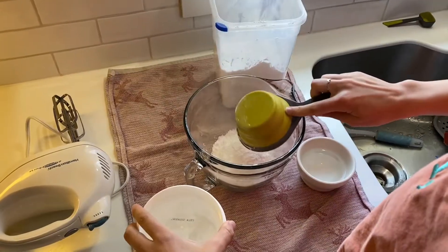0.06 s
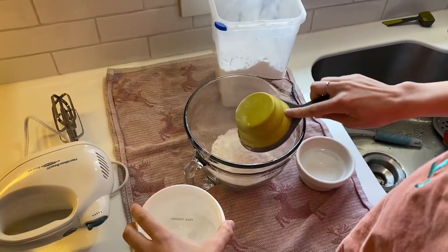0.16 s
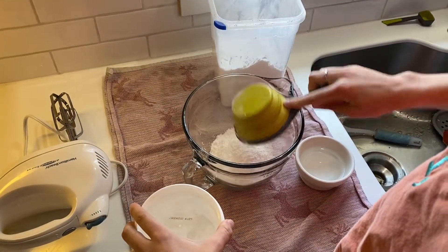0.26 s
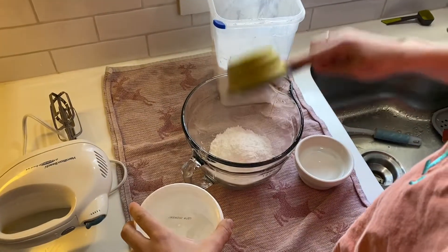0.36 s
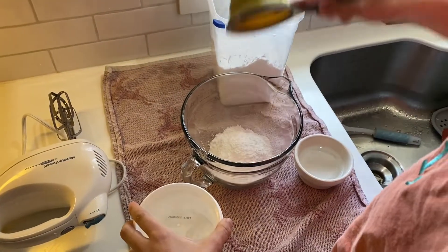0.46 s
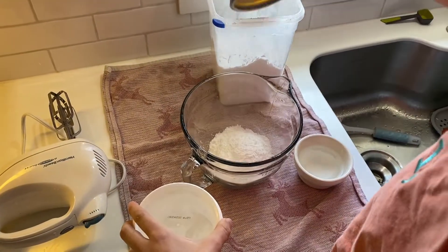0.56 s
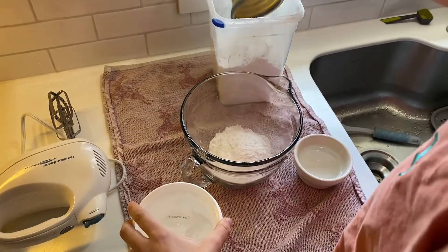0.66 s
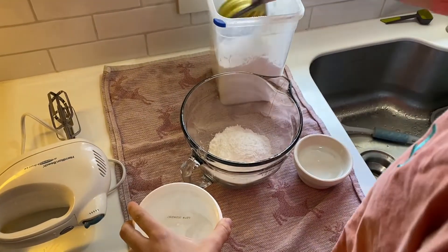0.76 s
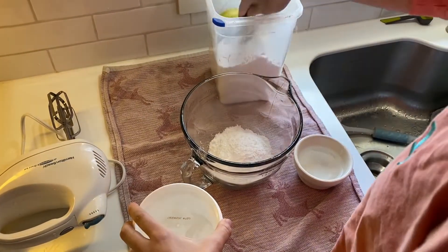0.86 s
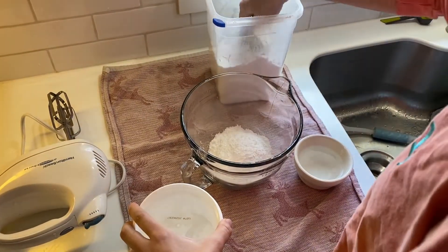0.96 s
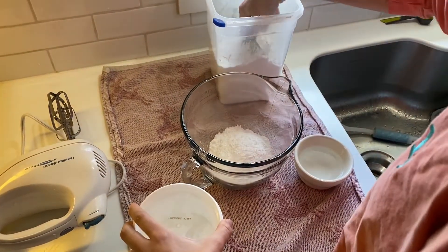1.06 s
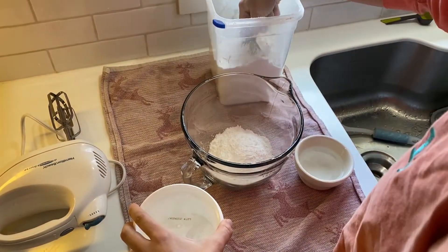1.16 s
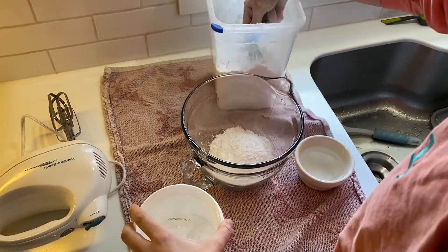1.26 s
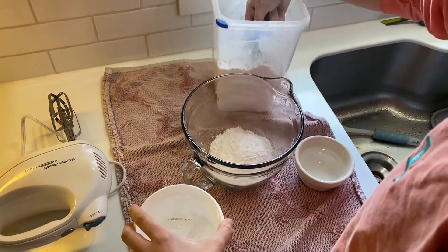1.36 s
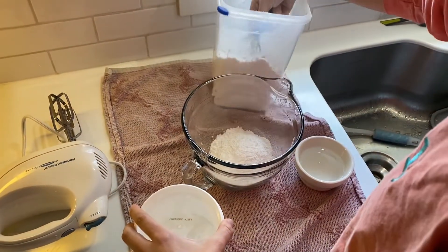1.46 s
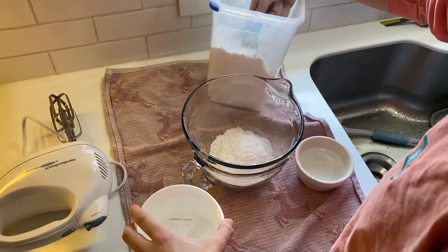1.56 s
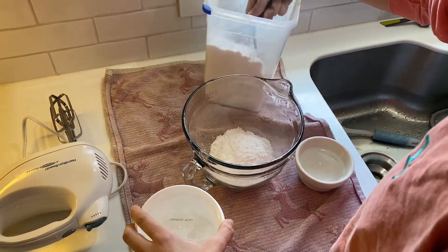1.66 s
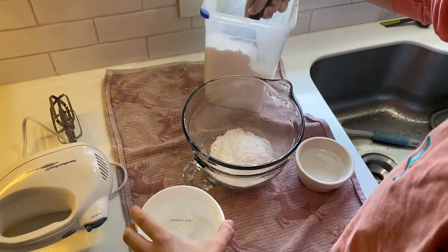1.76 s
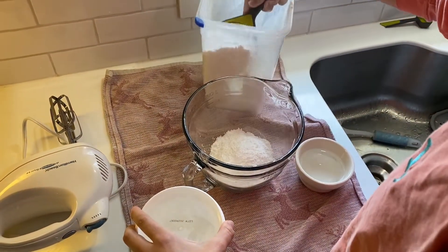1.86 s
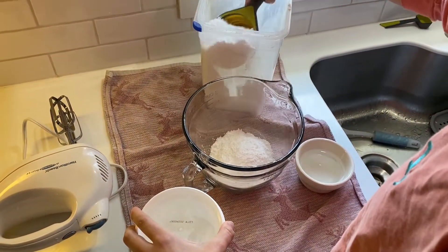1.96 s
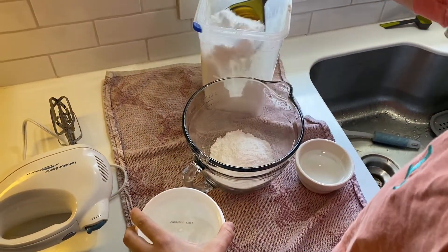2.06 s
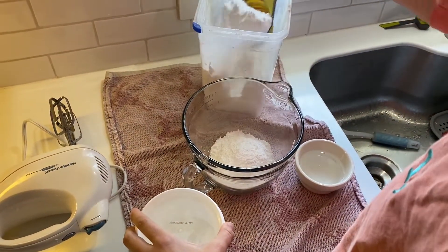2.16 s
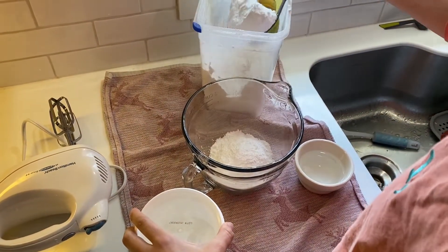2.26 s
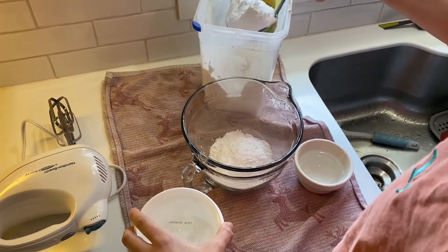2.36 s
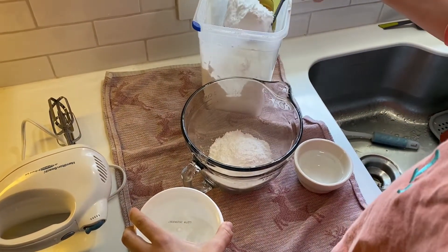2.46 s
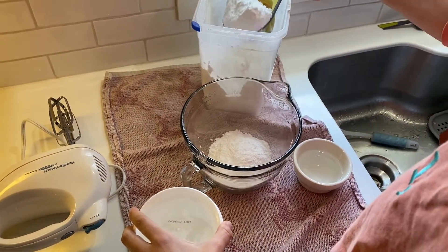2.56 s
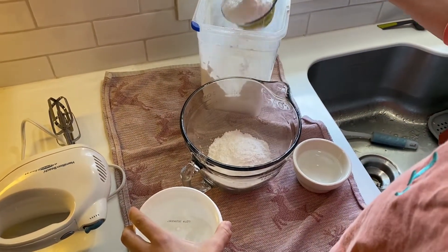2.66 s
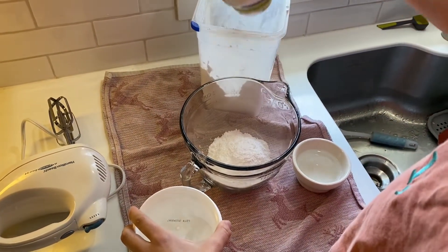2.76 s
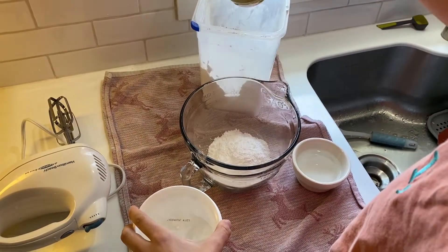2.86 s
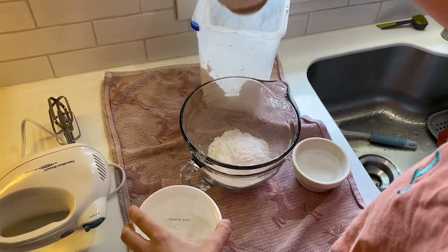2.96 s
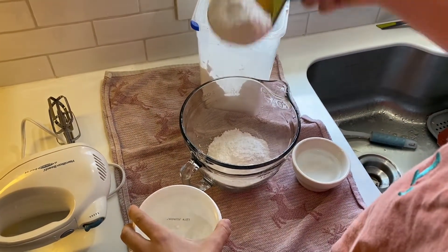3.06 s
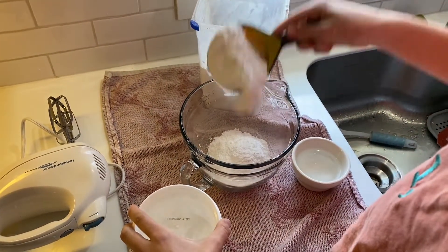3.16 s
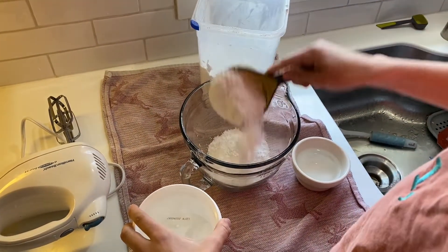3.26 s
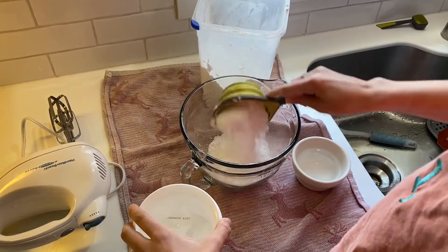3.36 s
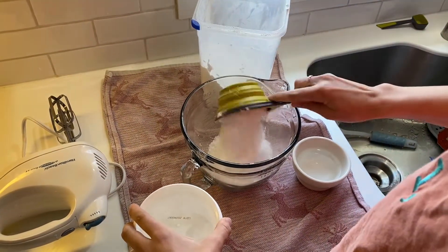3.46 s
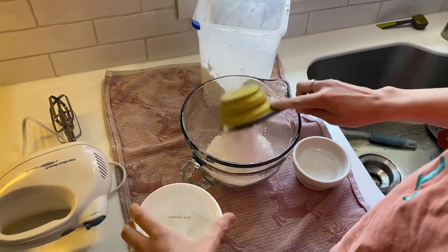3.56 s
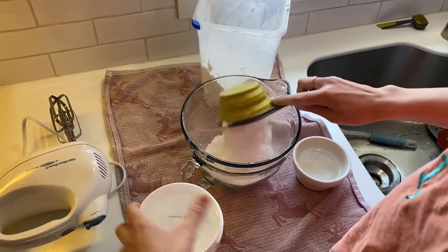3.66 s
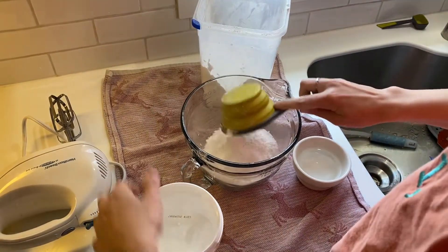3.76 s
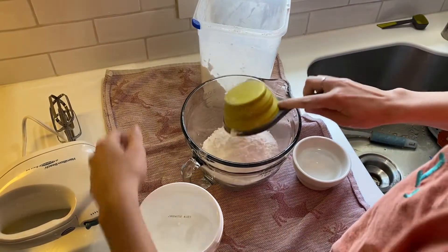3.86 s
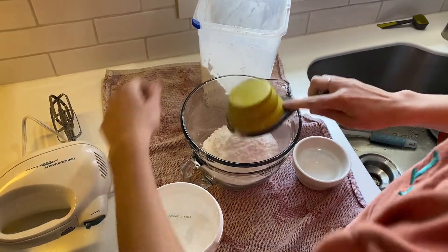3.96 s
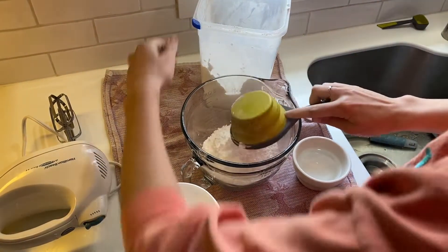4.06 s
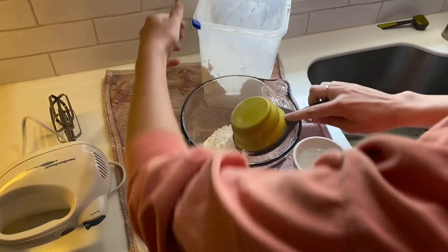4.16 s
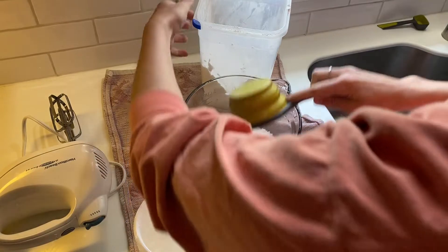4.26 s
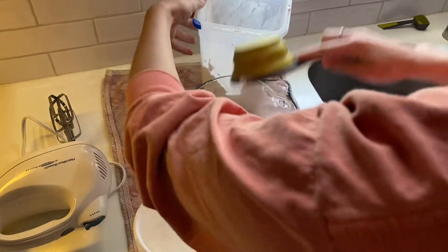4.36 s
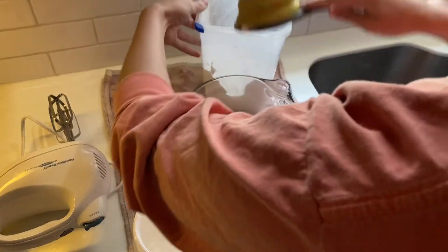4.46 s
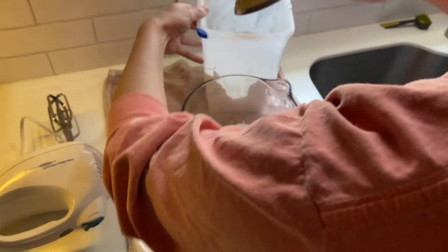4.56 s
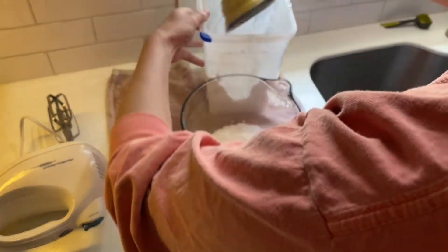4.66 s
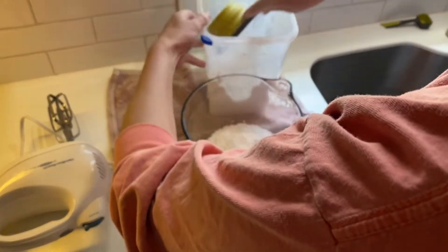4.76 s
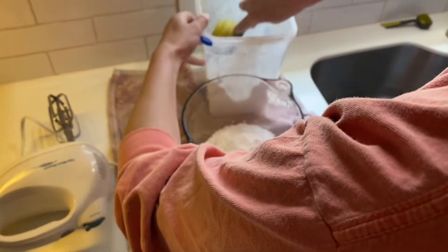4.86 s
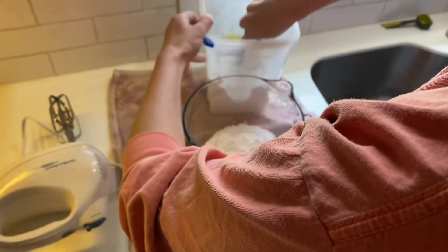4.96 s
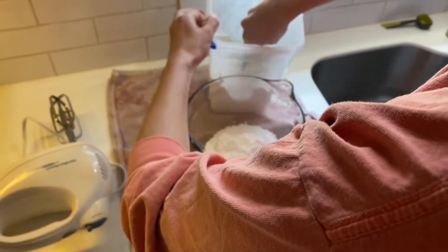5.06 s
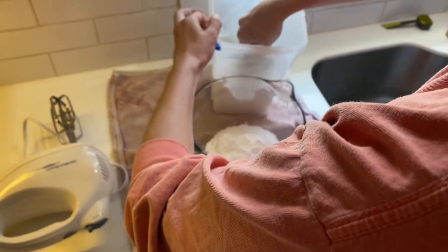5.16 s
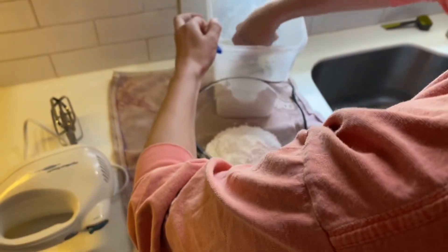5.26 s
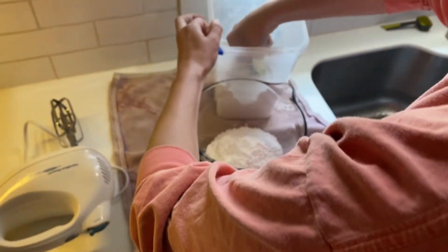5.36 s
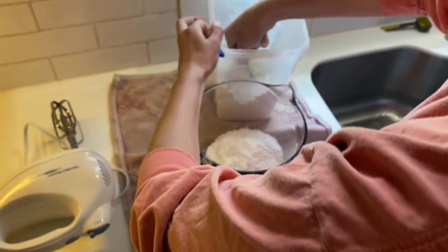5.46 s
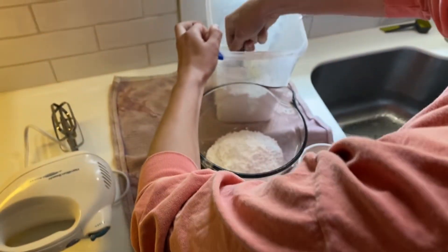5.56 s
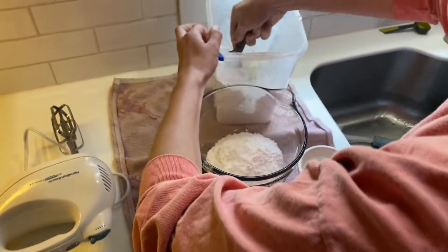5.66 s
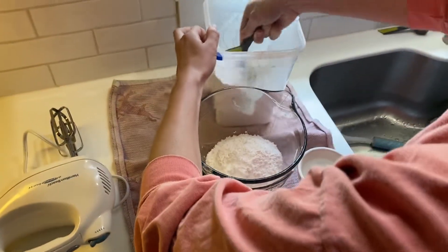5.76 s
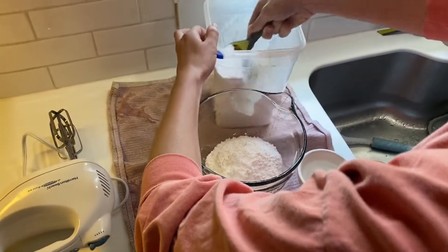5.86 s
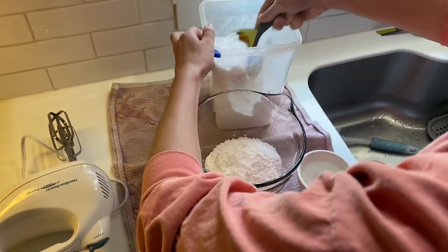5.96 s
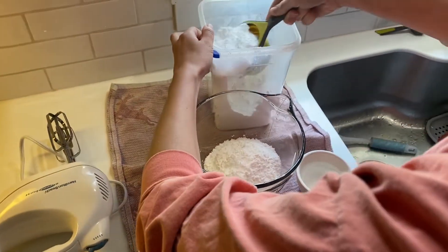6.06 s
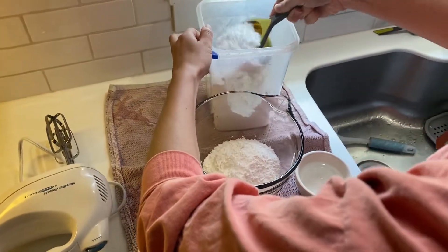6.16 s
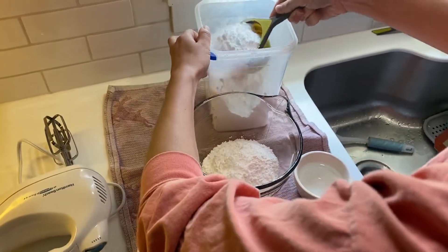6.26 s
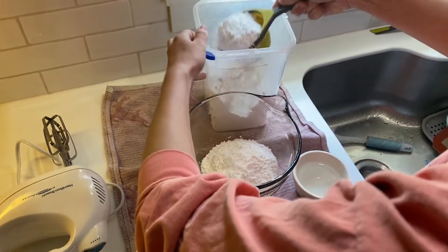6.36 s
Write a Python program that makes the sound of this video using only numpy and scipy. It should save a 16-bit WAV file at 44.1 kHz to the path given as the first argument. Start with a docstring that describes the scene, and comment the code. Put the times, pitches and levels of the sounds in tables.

```python
"""A quiet kitchen close up: air and fridge tones throughout, made of coloured noise and wavering sines.
At once a metal measuring cup taps a glass bowl's rim twice: decaying modes for glass and cup, noise for cracks.
From half a second on it knocks a plastic tub (short modes, thumps, ticks) and drags through the powder in it
(uneven noise); three more taps fall between about 3.6 and 4.1 s, and knocks and drags go on to the end.
Tiled walls add a short tail of decaying noise to the taps, knocks and drags."""
import sys
import numpy as np
from scipy import signal
from scipy.fft import rfft, irfft
from scipy.io import wavfile
from scipy.ndimage import uniform_filter1d

SR = 44100
rng = np.random.default_rng(int(sys.argv[2]) if len(sys.argv) > 2 else 0)


def master_out(mix):
    """Clip the mix to full scale and print it as 16-bit PCM to the path in sys.argv[1]."""
    frames = np.transpose(np.atleast_2d(mix))
    ceiling = np.clip(frames, -1, 1)
    pcm = np.round(ceiling * 32767).astype(np.int16)
    wavfile.write(sys.argv[1], SR, pcm)


N = 282240
T = np.arange(N) / SR  # seconds
HZ = np.maximum(np.fft.rfftfreq(N, 1 / SR), 1)
SIDES = np.array([[1.], [-1.]])  # left, right

# Cup on rim. Each row: start in seconds, cup level in dB, cup tilt in dB per octave, crack in dB,
# clatter in dB, counter boom in dB, foot of the bowl in dB.
TAPS = [(.001, -31.5, 4, -17.5, -41.5, -33.5, -38), (0.143, -33, 4, -16.5, -37, -29, -34.5),
        (3.5862, -47, 3.5, -24, -35.5, -33.5, -39), (4.0349, -62, -0.5, -34.5, -51, -44, -40.5),
        (4.1231, -40, 1.5, -23, -37.5, -39.5, -34)]
# Modes of the cloth-covered counter. Each row: pitch in Hz, relative level in dB, t60 in seconds.
COUNTER = [(76.35, 0.5, 0.45), (56.4, -3.5, 0.51), (46.7, -9.5, 0.41), (104.6, -8, .2)]
# Short modes of the tub wall: its click, then its sharp edge.
# Each row: pitch in Hz, relative level in dB, t60 as a share of the whole knock's or catch's.
TUB_WALL = [(640, -8, 0.82), (799, -1, 0.57), (1060, -4, 0.95), (1259, -7, 0.81), (1433, -6, 0.65)]
TUB_EDGE = [(1914, -5, 0.48), (2365, -5.5, 0.49), (2838, -3.5, 0.36), (3320, -7.5, 0.17),
            (4090, -15.5, 0.24)]


def undb(db):
    """Turns a level in dB into a gain."""
    return 10 ** (np.asarray(db) / 20)


def along(points):
    """Reads the second column at every frequency, with straight lines on a log pitch axis."""
    hz, values = np.transpose(points)
    return np.interp(np.log(HZ), np.log(hz), values)


def spread(gain, width):
    """Noise of the given colour, rms 1: partly unrelated left and right, and later on the right."""
    lag_s = .00003
    mid, side = rfft(rng.standard_normal((2, N))) * gain
    shift = np.exp(1j * np.pi * HZ * lag_s * SIDES)
    noise = irfft((mid + width * SIDES * side) * shift, N)
    return noise / noise.std()


def fade(t60, rise=0.0013):
    """Time axis and a quick rise with an exponential fall; t60 is the seconds it takes to fall 60 dB."""
    t = T[:int(1.2 * t60 * SR) + 1]
    return t, np.exp(-np.log(1000) * t / t60) * (1 - np.exp(-t / rise))


def ring(hz, db, t60, pan_db=0, width=0, rise=0.0013):
    """One decaying mode, whose lobes reach left and right out of step; pan is left minus right."""
    t, env = fade(t60, rise)
    wave = np.sin(2 * np.pi * hz * t + SIDES * np.arctan(width))
    return undb(db + SIDES * pan_db / 2) * env * wave


def add(out, s, x):
    """Mixes x into out from second s."""
    i = int(s * SR)
    n = min(x.shape[-1], N - i)
    out[..., i:i + n] += x[..., :n]


def walk(rate):
    """Slow random wandering, spread 1, with a new random value `rate` times a second."""
    k = int(SR / rate)
    steps = np.repeat(rng.standard_normal(N // k + 1), k)
    x = uniform_filter1d(steps, k)[:N]
    return x / x.std()


def tone(hz, db, waver):
    """A motor tone that drifts a little in pitch (waver, in Hz) and in strength."""
    turn = 2 * np.pi * np.cumsum(hz + waver * walk(12)) / SR
    level_db = db + 2.0 * walk(9) + 1.2 * SIDES * walk(15.0)
    return np.sqrt(2) * undb(level_db) * np.sin(turn + 0.27 * SIDES)


def kitchen():
    """Steady air, most alike left and right in the bass, and the tones of the fridge."""
    # Colour of the air. Each row: pitch in Hz, relative level in dB per Hz.
    air_colour = [(20, -41), (35, -20.5), (60, -7.5), (90, -11.5), (200, -13.5), (250, -11), (330, -17.5),
                  (450, -22), (1050, -31), (1300, -35.5), (1900, -48.5), (3500, -50.5), (7500, -56),
                  (12000, -63), (16000, -71)]
    # Likeness of left and right in the air. Each row: pitch in Hz, likeness from 0 to 1.
    alike = [(60, 1), (130, 0.78), (290, .55), (640, 0.035), (16000, .05)]
    # Steady fridge tones. Each row: pitch in Hz, level in dB, wavering in Hz.
    hum = [(58.7, -66.5, 1.2), (121.6, -74.5, 0.52), (236.2, -61, 2), (593, -82.5, 3.4)]
    # A higher fridge tone that comes and goes. Each row: time in seconds, level in dB.
    whine_levels = [(0, -79), (.68, -66), (1.5, -67), (2.1, -81), (2.5, -66.5), (3.4, -63.5), (3.9, -90),
                    (4.58, -76.5), (4.85, -66.5), (6.4, -64.5)]
    air_db, whine_hz = -58, 398.7

    like = np.clip(along(alike), 0, 1)
    mid, side = rfft(rng.standard_normal((2, N))) * undb(along(air_colour))
    air = irfft(mid * np.sqrt(1 + like) + SIDES * side * np.sqrt(1 - like), N)
    whine = tone(whine_hz, np.interp(T, *np.transpose(whine_levels)), 0.72)
    return air / air.std() * undb(air_db) + whine + sum(tone(*line) for line in hum)


def tap_ring():
    """Each tap stops the old ring, mostly the bowl's, and starts it anew; modes are stronger near a lobe."""
    # Strongest ringing modes of the taps, mostly the bowl's; the short one at 4205 Hz is probably the cup.
    # The rim bends in close pairs that beat. Each row: pitch in Hz, t60 in seconds,
    # left minus right in dB, stereo width (minus: right comes first).
    ring_modes = [(581.6, .57, 0, .2), (619.5, .6, 3, .3), (1471.8, .63, 6, -.55), (1500.7, .64, -1, 1.05),
                  (2628.5, .41, 5, -.4), (2694.5, .32, -3, .35), (3781, .3, -3, .3), (4205, .06, -10, 1.2),
                  (4240, .34, -6, .8), (4769, .38, -2, 1.6), (6192, .1, 1, -.5), (6441, .17, 1, .1),
                  (7595, .27, -5, -.5), (10800, .22, -1, 0)]
    # How each mode lies round the rim, in the same order. Each row: level in dB when struck on a lobe,
    # waves round the rim (0: the same all round), angle of a lobe in degrees.
    lobes = [(-29, 2, 0), (-40.5, 2, 144), (-30.5, 3, 143.7), (-26, 3, 158.5), (-32.5, 4, 71),
             (-27, 4, 169.4), (-33, 5, 31.7), (-23.5, 0, 0), (-42, 1, 101), (-39.5, 5, 1), (-34, 5, 109),
             (-38.5, 5, 26), (-52, 3, 142), (-54, 3, 16)]
    # How the ring takes each tap. Each row: place on the rim in degrees, level in dB,
    # tilt in dB per octave, share of the ring time left by the powder.
    landings = [(56.7, 1.1, .8, 1), (137.5, 0, -.5, 1), (123, -3.9, -1, .9), (46.1, -7.8, .1, .86),
                (40.4, -6.7, 1.8, .86)]
    node_db = -25  # what is left of a mode struck on its node

    out = np.zeros((2, N))
    starts = [row[0] for row in TAPS]
    gaps = np.diff(starts + [N / SR])  # seconds until the next tap
    for s, (place, tap_db, tilt_db, share), free in zip(starts, landings, gaps):
        for (hz, t60, pan_db, width), (db, waves, lobe) in zip(ring_modes, lobes):
            reach = np.hypot(np.cos(np.radians(waves * (place - lobe))), undb(node_db))
            level_db = db + tap_db + tilt_db * np.log2(hz / 1500)
            mode = reach * ring(hz, level_db, share * t60, pan_db, width)
            stop = np.clip((free - T[:mode.shape[1]]) / .002 + 1, 0, 1)  # 2 ms fade-out
            add(out, s, mode * stop)
    return out


def taps():
    """Each tap also rings the cup, cracks, clatters, sounds the bowl's foot and thuds into the counter."""
    # Pitches of the cup's modes, in Hz.
    cup_hz = [1040, 1655, 1720, 4285, 5515, 5865, 6099, 6725, 7720, 8280, 8683, 8882, 9318, 9410, 9706,
              10400, 10970, 11370, 11750, 12350]
    # The cup rings thinner and shorter, one row for each pitch. Each row: level in dB, t60 in seconds,
    # left minus right in dB, stereo width from 0 to 1.
    cup = [(-5, 0.25, 5, 0.2), (-16, 0.49, -2.5, .9), (-12, 0.37, -3.5, .9), (-17, 0.14, -6, .5),
           (-17.5, 0.18, 2.5, 0.01), (-21, 0.3, -4, .5), (-20, 0.18, -5.5, 0.8), (-25, 0.4, -6.5, 0.3),
           (-17.5, 0.17, -9.5, .8), (-27, 0.098, -2, 1), (-25, 0.06, -1.5, 0.7), (-29, .18, -0.5, 0.7),
           (-26.5, .2, -1, 0.3), (-25, 0.17, -0.5, .5), (-28, .2, -1.5, 0), (-21, .17, -3.5, .1),
           (-21.5, 0.1, -2, .1), (-16.5, .09, 0, .1), (-26.5, 0.17, -4, 0.3), (-26, .09, 0, .8)]
    # Colour of crack and clatter. Each row: pitch in Hz, relative level in dB per Hz.
    crack_colour = [(88, -39.5), (150, -3), (1480, 0.5), (2180, -8), (2760, -6), (3290, -23), (4240, -6),
                    (5250, -18.5), (6640, -17), (11000, -25), (16000, -66)]
    # Modes of the bowl's foot. Each row: pitch in Hz, relative level in dB, t60 in seconds.
    foot = [(152, 1, 0.13), (180, 3, 0.11), (356.5, -5.5, 0.13), (467, -7.5, 0.044)]
    crack_t60_s, clatter_t60_s = 0.04, .2

    out, burst = np.zeros((2, N)), np.zeros(N)
    luck = rng.standard_normal((len(TAPS), len(cup)))
    for (s, cup_db, tilt_db, crack_db, clatter_db, boom_db, foot_db), odd in zip(TAPS, luck):
        for hz, (db, t60, pan_db, width), z in zip(cup_hz, cup, odd):
            level_db = db + cup_db + tilt_db * np.log2(hz / 3000) + 2 * z
            add(out, s, ring(hz, level_db, t60, pan_db, width))
        for hz, db, t60 in COUNTER:
            add(out, s, ring(hz, db + boom_db, t60, rise=.005))  # the cloth slows the push
        for hz, db, t60 in foot:
            add(out, s, ring(hz, db + foot_db, t60, rise=.003))
        add(burst, s, undb(crack_db) * fade(crack_t60_s)[1])
        add(burst, s, undb(clatter_db) * fade(clatter_t60_s, 0.017)[1])
    return out + burst * spread(undb(along(crack_colour)), 0.59)


def knocks():
    """The thin wall clicks, higher parts mostly dying sooner; the tub's hollow thumps; the counter shakes."""
    # Cup against the tub wall. Each row: start in seconds, click in dB, then relative to the click:
    # hollow thump in dB, sharp edge in dB, treble tick in dB; last the thump's pitch in Hz.
    knock_list = [(0.551, -62, -8, -9, -8, 230), (0.702, -31.5, 3, -5.5, -35, 246.5),
                  (0.797, -17, -5.5, -7.5, -14, 277.7), (0.869, -39.5, -2.5, 4, -8.5, 202),
                  (1.243, -57, -10, -4, -4.5, 238), (1.288, -61, 19.5, 3, -2, 240.4),
                  (1.596, -55, -21, 2, -10, 240), (1.749, -53, -1.5, -1, -13, 237),
                  (1.804, -49, -9, 7, -7, 242), (1.867, -54, -13, 11.5, -8, 250),
                  (1.933, -62.5, -7, 0, -4, 235), (2.27, -50.5, 12, -20, -38, 187.4),
                  (2.656, -48, -8, -9.5, -20.5, 242), (3.257, -48.5, 3.5, -3.5, -23, 185),
                  (3.3, -39, -6, -7, -22, 240), (3.351, -52.5, 5.5, -10, -19, 234),
                  (3.463, -47, -1.5, -15.5, -39, 222.6), (4.011, -51.5, 0, -14, -12, 308.4),
                  (4.427, -46.5, -12, -19, -25, 221), (4.796, -33.5, -6, -3, -36.5, 320),
                  (4.811, -43, 12.5, -18, -27, 273.4), (4.819, -36.5, 2.5, -1.5, -22, 231),
                  (4.834, -41.5, 2.5, -16, -22, 228), (5.056, -25.5, -1.5, -10.5, -46, 260),
                  (5.161, -49, -3.5, -14, -18, 277), (5.655, -41.5, -9, 5.5, -14.5, 250),
                  (5.883, -48.5, -0.5, -14, -25, 252), (5.897, -49, -5, -10, -19, 202),
                  (5.915, -49, -7.5, -19, -14, 269), (6.053, -60, 10.5, 1, -11, 234)]
    # Modes of the hollow. Each row: multiple of the thump pitch, relative level in dB, t60 in seconds.
    hollow = [(0.649, -5, 0.1), (0.999, 6.5, 0.064), (1.3, -3.5, 0.095), (1.75, -2, 0.074),
              (2.2, -8, 0.084)]
    # Colour of the treble tick. Each row: pitch in Hz, relative level in dB per Hz.
    tick_colour = [(3500, -38), (4500, 4), (8000, -5), (11500, 3), (13500, -25), (15500, 4), (17000, -8.5)]
    knock_t60_s, pan_db = 0.036, 2

    out, tick = np.zeros((2, N)), np.zeros(N)
    luck = rng.standard_normal((len(knock_list), 3, len(hollow)))
    for (s, db, thump_db, edge_db, tick_db, thump_hz), (low, mid, high) in zip(knock_list, luck):
        for modes, part_db, odd in (TUB_WALL, db, mid), (TUB_EDGE, db + edge_db, high):
            for (hz, mode_db, share), z in zip(modes, odd):
                pitch = hz * (1 + 0.054 * z)  # a little different at every knock
                add(out, s, ring(pitch, part_db + mode_db, share * knock_t60_s, pan_db, 0.59, 0.86 / hz))
        add(tick, s, undb(db + tick_db) * fade(0.78 * knock_t60_s, 0.00041)[1])
        for (ratio, mode_db, t60), z in zip(hollow, low):
            pitch = thump_hz * ratio * (1 + 0.05 * z)
            add(out, s + .002, ring(pitch, db + thump_db + mode_db, t60, rise=0.0048))  # just after
        for hz, mode_db, t60 in COUNTER:
            add(out, s, ring(hz, db + thump_db + mode_db - 18.5, t60, rise=0.019))
    return out + tick * spread(undb(along(tick_colour)), 0.25)


def drags():
    """The wall scrapes in uneven slips, each resonance catching on its own; grains hiss more evenly."""
    # Cup dragged through powder or shaken empty. Each row: full contact in seconds, hold in seconds,
    # scrape on the wall in dB, hiss of the grains in dB, seconds to rise 20 dB, seconds to fall 20 dB
    # (rises and falls under .001 count as .001).
    strokes = [(1.191, .05, -83.5, -77, .06, -0.4), (1.251, 0.04, -66.5, -57.5, -0.16, 0.02),
               (1.53, 0.074, -75.5, -72, 0.2, 0.38), (1.778, 0.17, -60, -69, 0.09, 0.06),
               (1.875, 0.017, -58.5, -63.5, 0.3, 0.05), (3.249, 0.011, -63, -77, -0.05, 0.13),
               (3.27, 0.012, -62, -74.5, -0.02, 0.2), (3.342, 0.0079, -87, -98, 0.5, 0.4),
               (4.429, .02, -59, -81, 0.09, 0.13), (3.9, 0.088, -92, -86.5, -0.1, 0),
               (4.317, 0.019, -65.5, -79, 0.1, -0.28), (4.845, 0.204, -63.5, -71, 0.13, 0.15),
               (5.159, 0.066, -63.5, -70, -0.06, 0.09), (5.549, 0.036, -64, -67.5, 0.02, 0.34),
               (5.798, 0.1, -61, -67.5, -0.01, 0.1), (5.893, 0.0046, -51, -65, -0.05, 0.0949)]
    # A jolt sets the powder sliding at once, then it settles. Each row: start in seconds,
    # scrape in dB, hiss in dB, seconds to fall 20 dB (under .001 counts as .001).
    jolts = [(0.705, -52, -64.5, 0.1444), (0.8, -39.5, -48, 0.1085), (1.595, -63, -66.5, 0.13),
             (1.69, -69, -67.5, 0.17), (2.658, -53, -85, -0.05), (3.3, -64.5, -94, 0.23),
             (4.012, -65.5, -77, 0.5), (4.796, -55.5, -73, 0.2), (5.057, -56, -89, 0.17),
             (5.408, -70.5, -90, 0.1), (5.656, -54.5, -71, 0.15)]
    # Wall resonances. Each row: pitch in Hz, width in Hz, relative level in dB.
    resonances = [(694, 1300, 2), (1106, 930, 1.5), (1700, 840, 2), (2560, 910, -4.5), (3300, 660, -3.5),
                  (4070, 2450, -3)]
    # Colour of the grains. Each row: pitch in Hz, relative level in dB per Hz.
    hiss_colour = [(3000, -17), (4500, -3), (6500, 3), (8300, -6), (11000, 5), (12500, -1), (13500, -12.5),
                   (15000, 3.5), (17000, -14)]
    jolt_rise_s = .002

    scrape, hiss = np.zeros(N), np.zeros(N)
    sudden = [(s, 0, scrape_db, hiss_db, jolt_rise_s, fall) for s, scrape_db, hiss_db, fall in jolts]
    for s, hold, scrape_db, hiss_db, rise, fall in strokes + sudden:
        away = np.maximum((s - T) / max(rise, .001), (T - s - hold) / max(fall, .001))
        touch = undb(-20 * np.clip(away, 0, 9))
        scrape = np.hypot(scrape, touch * undb(scrape_db))
        hiss = np.hypot(hiss, touch * undb(hiss_db))

    wall = np.zeros((2, N))
    for hz, width, db in resonances:
        peak = 1 / (1 + ((HZ - hz) / (width / 2)) ** 2)
        wall += undb(db + 3.2 * walk(45)) * spread(peak, 0.82)
    wall /= wall.std()
    grains = spread(undb(along(hiss_colour)), 0.96)

    slips, grit = walk(60), walk(400)
    scraping = scrape * undb(1.9 * slips + 0.33 * grit) * wall
    hissing = hiss * undb(0.77 * slips + 0.59 * grit) * grains
    return catches(scrape) + scraping + hissing


def catches(scrape):
    """While it scrapes, the cup's edge catches at random and rings the wall's upper modes."""
    per_s, level_db, spread_db, t60_s, pan_db = 220, -5, 3, .05, 2
    strength = undb(spread_db * rng.standard_normal(N) + level_db) * scrape
    hits = (rng.random(N) < per_s / SR) * strength
    out = np.zeros((2, N))
    for hz, db, share in TUB_WALL[-1:] + TUB_EDGE:
        mode = ring(hz, db, share * t60_s, pan_db, .55)
        uneven = hits[None] * undb(3 * walk(60))
        out += signal.fftconvolve(uneven, mode)[:, :N]
    return out


def room(x):
    """Diffuse tail of the tiled walls: noise in bands, each dying at its own rate."""
    # Bands of the tail. Each row: centre in Hz, t60 in seconds, level in dB.
    bands = [(147, 0.36, -15.5), (370, 0.28, -6), (1020, .35, -7.5), (2580, .33, -8), (6000, 0.24, -5.5),
             (12000, 0.24, -20)]
    tail = np.zeros((2, N))
    for hz, t60, db in bands:
        env = fade(t60, 0.0028)[1]
        band = signal.butter(2, [hz / 1.55, hz * 1.55], "band", fs=SR, output="sos")
        noise = signal.sosfilt(band, rng.standard_normal((2, len(env))))
        add(tail, .004, undb(db) * noise * env / np.sqrt(np.sum(env ** 2)))
    return irfft(rfft(tail) * rfft(x.mean(axis=0)), N)


def scene():
    """Close events, their tail and the kitchen."""
    ring_send_db = -12  # the strong ring of the taps has less tail than the other sounds
    ringing = tap_ring()
    near = taps() + knocks() + drags()
    return ringing + near + room(near + undb(ring_send_db) * ringing) + kitchen()


def record(dry):
    """Makes the left a little louder than the right and cuts the top."""
    left_db, top_hz = 0.5, 15800  # the right goes down by as much as the left goes up
    cut = signal.ellip(10, .2, 70, top_hz, fs=SR, output="sos")
    return signal.sosfilt(cut, dry * undb(left_db * SIDES))


dry = scene()
out = record(dry)
master_out(out)
```